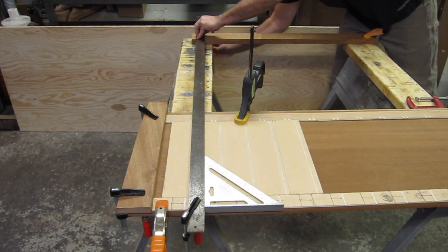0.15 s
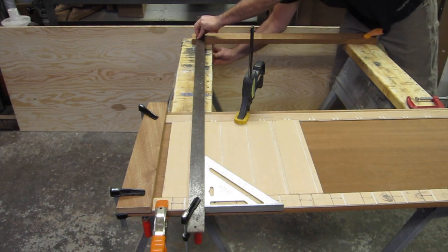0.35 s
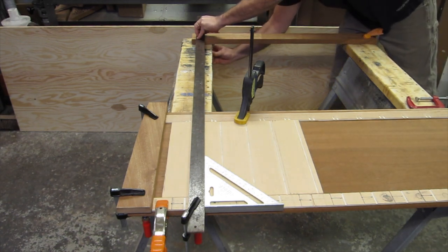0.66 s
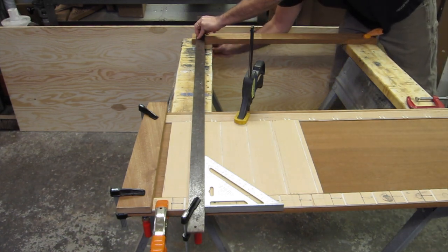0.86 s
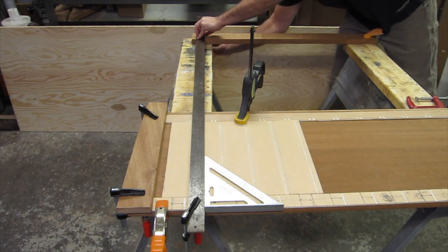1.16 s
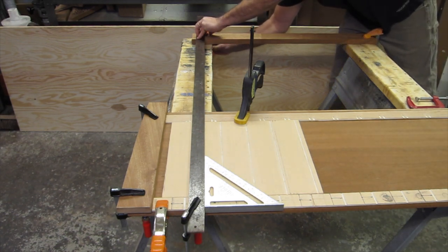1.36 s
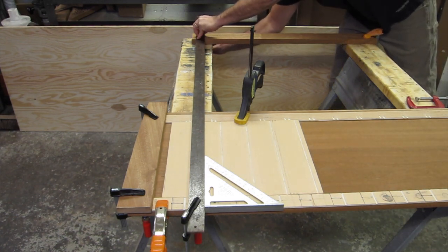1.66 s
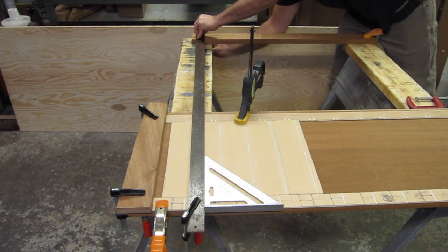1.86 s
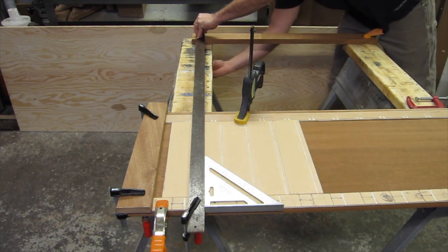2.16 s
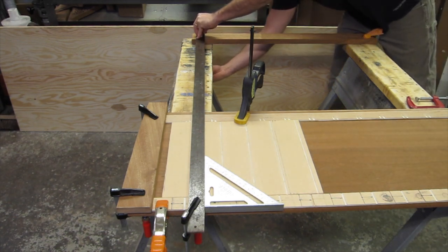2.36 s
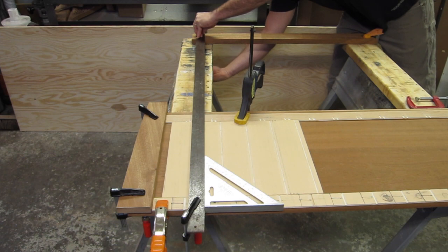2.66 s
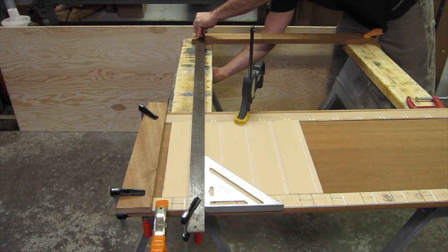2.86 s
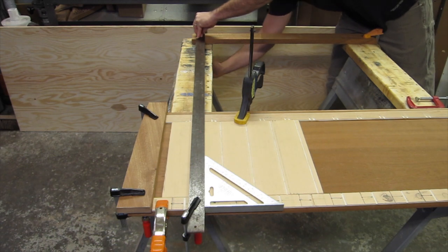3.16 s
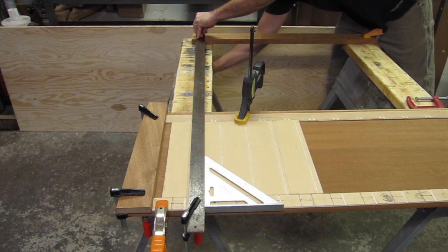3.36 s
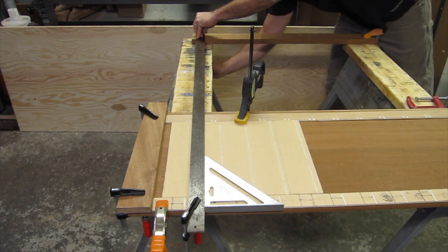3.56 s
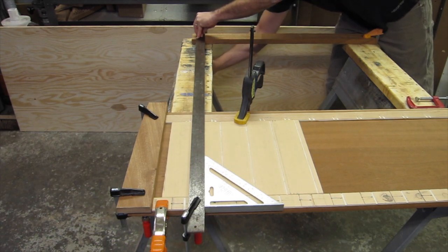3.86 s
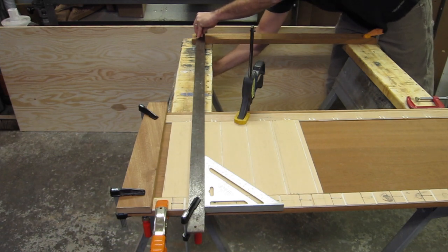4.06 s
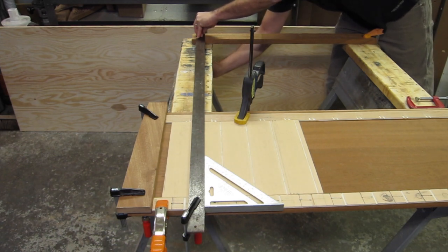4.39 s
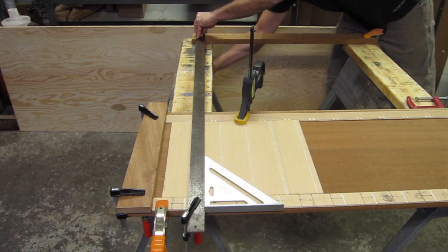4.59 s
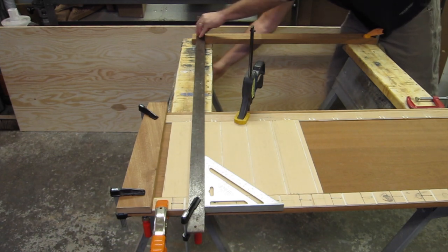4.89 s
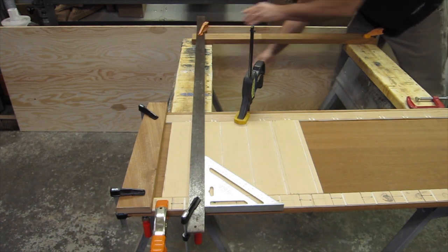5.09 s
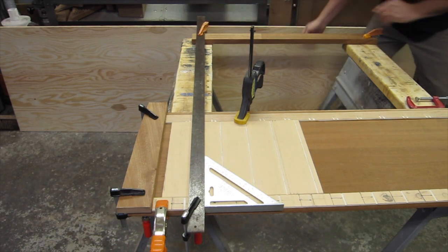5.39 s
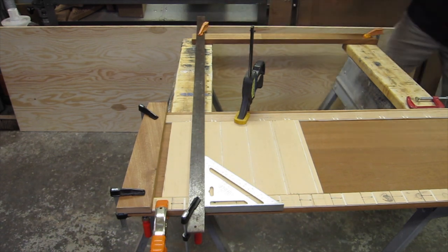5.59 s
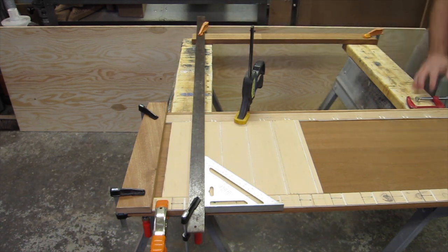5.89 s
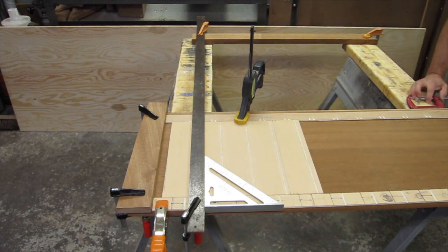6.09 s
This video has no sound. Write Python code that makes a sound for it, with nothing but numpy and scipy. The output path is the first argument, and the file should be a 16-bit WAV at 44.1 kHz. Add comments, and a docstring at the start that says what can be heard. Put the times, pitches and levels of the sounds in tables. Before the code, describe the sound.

Irregular metallic clacks, soft screw ticks and hand rustles in a woodshop over low fan hum, ending with a sharp tool knock.

```python
"""In a small woodshop, a bar clamp is fitted over a steel straight edge on a wooden panel and screwed tight.
Bar, jaw, straight edge, pad and handle knock, the screw ticks and a tool is bumped at the end: noise bursts
ring each part's modes and a room echo. The bar groans as it takes the load: wobbling tones with a rasp.
Hands brush the work (grainy noise), trestles and a foot thud (dying low tones).
Behind it all lie air noise, a fan's drone (narrow bands of noise) and a faint whine (steady tones)."""
import sys
import numpy as np
from scipy import signal
from scipy.fft import rfft, irfft, next_fast_len
from scipy.io import wavfile
from scipy.ndimage import uniform_filter1d

SR = 44100
rng = np.random.default_rng(int(sys.argv[2]) if len(sys.argv) > 2 else 0)


def to_wav(s):
    """Save 16-bit WAV."""
    ch = np.atleast_2d(s).T  # columns
    pcm = np.round(np.clip(ch, -1, 1) * 32767)  # PCM
    wavfile.write(sys.argv[1], SR, pcm.astype(np.int16))


N = 275051

# how wide the room's sound is at each pitch: (frequency [Hz], side level over mid [dB])
SIDE_IN_ROOM = [(60, -35), (150, -29), (350, -19), (700, -14), (1400, -8), (2800, -4), (5000, 0),
                (12000, -0.5)]
# what the straight edge rings with: (frequency [Hz], width [Hz], height [dB], ring t60 [s])
STRAIGHT_EDGE_MODES = [(378, 7, 11.4, 0.88), (880, 96, 7.5, 0.24), (1210, 380, 5.9, 0.7),
                       (1670, 100, 12.3, 0.29), (1840, 74, 6.2, 0.16), (2277, 120, 15, 0.16),
                       (2815, 210, 11.5, 0.3), (3250, 110, 6.5, 0.17), (3680, 150, 3.7, 0.16),
                       (4680, 100, 18.6, 0.23), (5500, 470, 10, 0.081), (6160, 110, 8.2, 0.13),
                       (7940, 91, 16, .15), (9550, 170, 12, 0.26), (10830, 160, 16, 0.22),
                       (11700, 160, 6.6, 0.24), (12410, 150, 6, 0.27), (13517, 120, 7.3, 0.18)]


def amp(db):
    """Turns decibels into a plain factor."""
    return 10 ** (np.asarray(db) / 20)


def unit(x):
    """Scaled to energy 1."""
    return x / np.sqrt(np.sum(x ** 2) + 1e-20)


def evened(x):
    """Scaled to rms 1."""
    return unit(x) * np.sqrt(x.size)


def read(points, hz):
    """Reads a curve along straight lines on a log-frequency axis."""
    f, value = np.transpose(points)
    return np.interp(np.log(hz + 1), np.log(f + 1), value)


def add(mix, s, sound):
    """Mixes a sound in at time s."""
    part = mix[..., max(round(s * SR), 0):][..., :sound.shape[-1]]
    part += sound[..., :part.shape[-1]]


def shaped(x, points):
    """Filtered by a spectrum of (Hz, dB) points."""
    size = next_fast_len(len(x))
    gain = amp(read(points, np.fft.rfftfreq(size, 1 / SR)))
    return irfft(rfft(x, size) * gain, size)[:len(x)]


def causal(points, size=2048):
    """The shortest causal pulse with this spectrum."""
    log_gain = np.log(amp(read(points, abs(np.fft.fftfreq(size, 1 / SR)))))
    return np.fft.ifft(np.exp(signal.hilbert(log_gain).conj())).real


def pair(mid, side):
    """Left and right from mid and side."""
    return np.array([mid + side, mid - side])


def shop(air_db=-50.5, drone_side_db=-18):
    """Steady air noise, a fan's wavering drone and a faint whine."""
    # colour of the air noise: (frequency [Hz], relative level [dB per Hz])
    air_colour = [(20, -15), (58, 3.5), (100, 2), (140, 4.5), (200, 4), (330, 1.5), (450, -5.5),
                  (700, -6.5), (1200, -10.5), (2000, -11), (3200, -19), (5500, -21), (7000, -28),
                  (11500, -28), (14000, -29.5), (16000, -60)]
    # width of the air noise: (frequency [Hz], side level over mid [dB])
    air_side = [(30, -4), (100, -4.5), (200, -12), (400, -4.5), (1000, -4), (2500, -1.5), (4500, 0.5),
                (12000, -0.5)]
    # the fan's narrow bands: (frequency [Hz], half-width [Hz], level [dB])
    drone_bands = [(60.5, 10.4, -62.5), (193.3, 2.5, -50.5), (235, 1.75, -52.5), (290.7, 3.4, -52),
                   (354, 2, -58), (960, 6.4, -66)]
    # steady high tones: (frequency [Hz], level [dB])
    whine_tones = [(8799, -80), (15735, -82)]
    mid, side = (evened(shaped(rng.standard_normal(N), air_colour)) for _ in range(2))
    air = amp(air_db) * pair(mid, shaped(side, air_side))

    size = next_fast_len(N)
    f, t = np.fft.rfftfreq(size, 1 / SR), np.arange(N) / SR
    noise = rfft(rng.standard_normal((2, size)))
    lines = sum(amp(db) * unit(1 / (1 + ((f - hz) / width) ** 2)) for hz, width, db in drone_bands)
    mid, side = irfft(noise * lines * np.sqrt(size / 2), size)[:, :N]
    drone = pair(mid, amp(drone_side_db) * side)

    whine = sum(amp(db) * np.sqrt(2) * np.sin(2 * np.pi * hz * t) for hz, db in whine_tones)
    return air + drone + whine


def room(early_db=-3, early_s=0.0067, gap_s=0.0042):
    """Echo of the shop: strong early returns from bench and floor, then a tail that loses its treble first."""
    # time the echo takes to fall by 60 dB: (frequency [Hz], t60 [s])
    echo_t60 = [(100, 1), (300, 1), (700, 0.7), (1400, 0.58), (2700, 0.44), (5400, 0.37), (11000, 0.27),
                (16000, 0.24)]
    hz, t, z = signal.stft(rng.standard_normal((2, SR)), SR, nperseg=256)
    fading = z * amp(-60 * t / read(echo_t60, hz)[:, None])
    mid, side = signal.istft(fading, SR, nperseg=256)[1][:, :SR]
    t = np.arange(SR) / SR
    swell = (1 + amp(early_db) * np.exp(-t / early_s)) * (1 - np.exp(-t / gap_s))
    return pair(unit(mid * swell), shaped(unit(side * swell), SIDE_IN_ROOM))


def ringing(modes, t, flutter=0.7):
    """Dying modes that flutter as the parts settle; low ones are nearly in step left and right, high ones less."""
    out = np.zeros((2, len(t)))
    for hz, width, db, t60 in modes:
        apart = rng.choice([-1, 1]) * np.arctan(amp(read(SIDE_IN_ROOM, hz)))
        phase = 2 * np.pi * rng.random() + np.array([[apart], [-apart]])
        knots = np.arange(0, 1, 1 / 80)  # a new random value 80 times a second
        sway, slip = (np.interp(t, knots, k) for k in flutter * rng.standard_normal((2, len(knots))))
        decay = unit(amp(-60 * t / t60) * (1 - np.exp(-t / 0.00037)) * (1 + sway))
        # a mode takes the share of a blow's energy that falls within its width
        out += np.sqrt(4 * width / SR) * decay * np.sin(2 * np.pi * hz * t + phase + slip)
    return out


def body(modes, size=420):
    """Resonant peaks of a part as (Hz, dB), levelled so that each octave keeps its energy."""
    f = np.geomspace(30, SR / 2, 4000)
    peaks = (amp(db) ** 2 / (1 + (2 * (f - hz) / width) ** 2) ** 1.25 for hz, width, db, t60 in modes)
    power = 1 + sum(peaks)
    return f, 10 * np.log10(power / uniform_filter1d(power, size))


def contact(f, cut_hz, tilt_db, rolloff_db):
    """Spectrum of a blow in dB: a tilt above 330 Hz, then a fall of rolloff_db per octave past the cut-off."""
    tilt = tilt_db * np.log2(np.maximum(f, 330) / 1000)  # pivots at 1000 Hz
    return tilt - 10 * np.log10(1 + (f / cut_hz) ** (rolloff_db / (10 * np.log10(2))))


def knocks(rows, modes, colour, rolloff_db, chatter_s, direct_db, room_db, ring_db, pan_db, left_lag_s=0):
    """Each blow is a snap and a short chatter of loose parts; it rings the part's modes and fills the room.

    A softer contact has a lower cut-off; a heavier push tilts the sound towards the bass."""
    # for all parts: small parts radiate little bass, the floor bounce cancels near 255 Hz and the very top
    # fades: (frequency [Hz], level [dB])
    shared_colour = [(40, -22), (100, -16), (150, 1), (215, -0.5), (255, -11), (330, 0), (11500, -0.5),
                     (13200, 4.5), (15300, -28)]
    out, t = np.zeros((2, N)), np.arange(SR * 3 // 4) / SR
    f, peaks_db = body(modes)
    part_db = peaks_db + read(colour, f) + read(shared_colour, f)
    for s, db, cut_hz, tilt_db, hard_db in rows:
        snap, chatter, scatter = rng.standard_normal((3, len(t)))
        rattle = np.exp(-t / chatter_s) * (1 - np.exp(-t / 0.00064))
        chatter = unit(chatter * rattle)
        scatter = shaped(unit(scatter * rattle), SIDE_IN_ROOM)
        blow = chatter + amp(hard_db) * unit(snap * np.exp(-t / 0.003))
        left, right = pair(blow, scatter) / np.linalg.norm(blow)
        left = np.roll(left, round(left_lag_s * SR))
        direct = np.array([left * amp(pan_db), right * amp(-pan_db)])
        sound = amp(direct_db) * direct + amp(room_db) * room()[:, :len(t)]
        sound = sound + amp(ring_db) * ringing(modes, t)
        spectrum_db = db + part_db + contact(f, cut_hz, tilt_db, rolloff_db)
        pulse = causal(np.transpose([f, spectrum_db]), size=4096)
        add(out, s, signal.fftconvolve(sound, pulse[None], axes=1))
    return out


def bar_knocks():
    """The bar is struck: a long chatter and modes that ring from low to very high."""
    # (time [s], strength [dB], contact cut-off [Hz], tilt [dB per octave], snap over chatter [dB])
    blows = [(0.052, 16, 12000, -0.03, 11), (0.297, 14, 5430, -2.3, 10), (1.658, 11, 3070, 0, 0),
             (2.023, 8.5, 2220, 1.8, 17)]
    # what it rings with: (frequency [Hz], width [Hz], height [dB], ring t60 [s])
    modes = [(419, 63, 11, 0.93), (544, 39, 13.5, 0.67), (1118, 35, 8, 0.35), (1676, 63, 10.5, 1),
             (1894, 62, 14.5, 0.22), (2005, 56, 13.5, 0.25), (2363, 180, 8, 0.27), (2895, 56, 8, .25),
             (3380, 180, 6.5, 0.099), (3650, 94, 7, 0.18), (5946, 97, 9, 0.2), (7960, 110, 16, .2),
             (10640, 360, 12, 0.27), (12300, 170, 22, 0.27), (15165, 90, 20, .2)]
    # broad colour under a hard blow: (frequency [Hz], level [dB])
    colour = [(200, -1.5), (330, 4), (660, 1), (1700, -1.5), (3100, -3.5), (5300, -18.5), (11500, -25.5)]
    return knocks(blows, modes, colour, rolloff_db=29, chatter_s=0.02,
                  direct_db=-8.5, room_db=-2, ring_db=-8.0, pan_db=-1.0)


def thuds(rise_s=0.0064):
    """Low blows swell and die in the room's bass resonances, each a fading sine tone."""
    # dull thuds of the trestles and a foot: (time [s], frequency [Hz], level [dB], t60 [s])
    low_blows = [(0.069, 186, -43.5, 0.53), (0.711, 141.6, -36, 0.7), (1.758, 175, -53, 0.64),
                 (3.223, 171, -37, 0.3), (5.403, 169, -43, 0.35), (5.421, 232, -32, 0.16)]
    out, t = np.zeros(N), np.arange(SR) / SR
    for s, hz, db, t60 in low_blows:
        envelope = amp(db - 60 * t / t60) * (1 - np.exp(-t / rise_s))
        add(out, s, envelope * np.sin(2 * np.pi * hz * t))
    return out


def groans(wobble=0.0062, rasp_db=-16, mode_wobble=0.005):
    """Stick and slip lock onto the bar's bending mode; higher modes sing, each slip rasps the straight edge."""
    # the bar slips under load: (time [s], length [s], pitch [Hz], glide [Hz], level of the main tone [dB])
    slipping = [(0.299, 0.18, 345.8, -1.5, -30.5), (3.647, 0.15, 352.8, -5.5, -30)]
    # higher resonances of the clamp that sing along: (frequency [Hz], level over the main tone [dB])
    singing_modes = [(590, -17), (950, -17), (1790, -20), (2280, -23), (2950, -31)]
    rasp_colour = [(300, -21), (550, -0.5), (2400, -7.0), (4000, -17), (8000, -35)]  # (Hz, dB)
    tone, rasp = np.zeros((2, N))
    for s, length, hz, glide_hz, db in slipping:
        u = np.linspace(0, 1, round(length * SR))
        unsteady = evened(uniform_filter1d(rng.standard_normal(SR), 300))[:len(u)]
        turns = np.cumsum((hz + glide_hz * (u - .5)) * (1 + wobble * unsteady)) / SR
        load = amp(db) * np.sin(np.pi * u) * (1 + .07 * unsteady)
        # one click of random strength per turn of the main tone
        slips = np.diff(np.floor(turns), prepend=0) * rng.exponential(1, SR)[:len(u)]
        clock = np.cumsum(1 + mode_wobble * unsteady) / SR
        singing = sum(amp(mode_db) * np.sin(2 * np.pi * mode_hz * clock)
                      for mode_hz, mode_db in singing_modes)
        add(tone, s, load * np.sqrt(2) * (np.sin(2 * np.pi * turns) + singing))
        add(rasp, s, load * evened(shaped(slips, rasp_colour)))
    rasp = signal.fftconvolve(rasp, causal(np.transpose(body(STRAIGHT_EDGE_MODES))))[:N]
    return tone + amp(rasp_db) * signal.fftconvolve(room(), rasp[None], axes=1)[:, :N]


def brushes(grain_db=4, direct_db=-6, room_db=0.5):
    """Grainy friction under each stroke of a hand: hiss whose loudness jitters."""
    # hands and sleeves over wood and steel: (time [s], length [s], level before the direct and room
    # shares [dB], brightness [dB])
    strokes = [(0.39, 0.041, -57, 2), (1.02, 0.23, -51.5, -18), (1.312, 0.31, -51.5, -2),
               (3.466, 0.065, -64, 21), (3.648, 0.057, -37.5, 3), (3.772, 0.062, -44, 0.5),
               (4.822, 0.097, -49, 5), (4.953, 0.084, -53, -20), (5.155, 1, -58.5, 4.5),
               (5.686, 0.026, -55, 5), (5.854, 0.1, -46.5, 6), (5.906, 0.23, -44.5, 6.5)]
    # colour of the friction: (frequency [Hz], level [dB])
    friction_colour = [(100, -10), (400, 13.5), (1200, 4), (2200, 6.5), (3300, 0.5), (5000, -2),
                       (7000, -12), (11500, -12.5), (16000, -23)]
    out = np.zeros(N)
    for s, length, db, bright_db in strokes:
        hiss, grain = rng.standard_normal((2, SR))
        hiss = hiss * amp(grain_db * evened(uniform_filter1d(grain, 120)))
        hiss = shaped(hiss, friction_colour)
        # brightness lowers the bass and lifts the treble
        hiss = shaped(hiss, [(2000, -bright_db), (11000, bright_db)])[:round(length * SR)]
        add(out, s, amp(db) * evened(hiss) * signal.windows.tukey(len(hiss), .6))
    echo = signal.fftconvolve(room(), out[None], axes=1)[:, :N]
    return amp(direct_db) * out + amp(room_db) * echo


def jaw_knocks():
    """The jaw is struck: a short chatter whose treble falls gently past the contact's cut-off."""
    # (time [s], strength [dB], contact cut-off [Hz], tilt [dB per octave], snap over chatter [dB])
    blows = [(0.663, 13.5, 5000, 0.5, -15), (0.668, 22.4, 15000, 0.65, -3), (0.785, 12, 2100, 1.5, -16),
             (0.94, 10.6, 700, -1, -18), (1.292, 10.6, 1500, 0.7, -6), (1.301, 17.7, 910, 2, -1),
             (1.368, 4.4, 1800, -7, -21), (1.46, 3.1, 2500, -3.5, 0), (1.499, 2.6, 2500, -7.5, -13)]
    # what it rings with: (frequency [Hz], width [Hz], height [dB], ring t60 [s])
    modes = [(479, 24, 7.4, 0.39), (575, 20, 12.1, 1), (795, 46, 3, 0.38), (970, 110, 7.6, 0.44),
             (1246, 95, 7.5, 0.12), (1671, 36, 13.8, 0.13), (1726, 28, 3, 1), (2650, 90, 2.7, 0.35),
             (3724, 67, 8.5, 0.24), (4530, 230, 7.4, 0.15), (4660, 67, 3.4, 0.77), (5980, 460, 5, 0.12),
             (10050, 400, 12.5, 0.11), (11100, 390, 12, 0.13), (12650, 220, 4.3, .13)]
    # broad colour under a hard blow: (frequency [Hz], level [dB])
    colour = [(200, -9.5), (330, 0.5), (660, 1), (1700, -2.5), (3100, -9.5), (5300, -12), (11500, -21.5)]
    return knocks(blows, modes, colour, rolloff_db=12, chatter_s=0.0079,
                  direct_db=-5.5, room_db=-2.0, ring_db=-4.5, pan_db=-1.0)


def edge_knocks():
    """The steel straight edge is struck and rings with the same modes that its rasp passes through."""
    # (time [s], strength [dB], contact cut-off [Hz], tilt [dB per octave], snap over chatter [dB])
    blows = [(1.74, 24.2, 6350, -0.44, 9), (2.48, 6.8, 1850, -0.1, -8)]
    # broad colour under a hard blow: (frequency [Hz], level [dB])
    colour = [(200, -7.5), (330, 1), (660, -0.5), (1700, -1.1), (3100, -0.2), (5300, -14), (11500, -2.5)]
    return knocks(blows, STRAIGHT_EDGE_MODES, colour, rolloff_db=26, chatter_s=0.012,
                  direct_db=-11.5, room_db=-3.5, ring_db=-8, pan_db=-1.2)


def pad_knocks():
    """The pad is struck: its ring is as strong as its room echo and well above the direct blow."""
    # (time [s], strength [dB], contact cut-off [Hz], tilt [dB per octave], snap over chatter [dB])
    blows = [(2.188, 20.76, 5800, 1.27, -7), (2.328, 8.5, 2760, 6.5, 15), (2.555, 2.4, 1600, -3, -15)]
    # what it rings with: (frequency [Hz], width [Hz], height [dB], ring t60 [s])
    modes = [(400, 20, 8.7, 0.25), (560.6, 84, 15, 0.23), (776, 18, 11.4, 0.46), (1056, 15, 3.8, 0.26),
             (1737, 130, 11, .35), (2260, 290, 8.6, 0.18), (2420, 400, 8.8, 0.14), (2940, 110, 5, 0.26),
             (3340, 41, 5.1, 0.17), (5220, 140, 15.5, 0.3), (5700, 160, 4.9, 0.17), (6700, 150, 4.9, 0.21),
             (9630, 200, 22, 0.37), (11600, 300, 17, .2), (12408, 150, 7, .2), (13350, 150, 7.3, 0.13)]
    # broad colour under a hard blow: (frequency [Hz], level [dB])
    colour = [(200, -11.5), (330, -0.5), (550, 3), (1000, -1.5), (1700, -4.5), (3100, -9.5), (5300, -14.5),
              (11500, -16.5)]
    return knocks(blows, modes, colour, rolloff_db=23.5, chatter_s=0.016,
                  direct_db=-13, room_db=-3.5, ring_db=-3.5, pan_db=0.0)


def handle_knocks():
    """The handle is struck: a short chatter and modes in the low and middle range."""
    # (time [s], strength [dB], contact cut-off [Hz], tilt [dB per octave], snap over chatter [dB])
    blows = [(2.758, 8.5, 1830, -1.5, -6), (2.8, 14.1, 2350, -1.3, 11), (3.147, 16.2, 3660, 0.84, 6),
             (3.221, 20.5, 2400, 1.2, 1)]
    # what it rings with: (frequency [Hz], width [Hz], height [dB], ring t60 [s])
    modes = [(384.5, 15, 9.2, 0.54), (567.4, 50, 6.4, 0.23), (832, 22, 4, 0.21), (965, 67, 4.6, 0.3),
             (1208, 120, 8.8, 0.21), (1610, 66, 4.8, 0.23), (1745, 72, 8, 0.19), (1875, 57, 7.7, 0.2),
             (2266, 60, 11, 0.27), (2490, 180, 7.6, 0.31), (2880, 89, 11, 0.44), (3370, 200, 8.8, 0.078)]
    # broad colour under a hard blow: (frequency [Hz], level [dB])
    colour = [(200, -10), (330, -3), (660, -1), (1150, -2.5), (1700, -1.5), (3100, -6.5), (5300, -18),
              (11500, -12)]
    return knocks(blows, modes, colour, rolloff_db=20, chatter_s=0.0075,
                  direct_db=-10.0, room_db=-7, ring_db=-7.0, pan_db=0.0)


def screw_ticks():
    """The screw ticks: the shortest chatter of all and only a few modes, a little to the left."""
    # (time [s], strength [dB], contact cut-off [Hz], tilt [dB per octave], snap over chatter [dB])
    blows = [(3.118, -21, 14000, 3, 16), (3.663, -4.5, 5500, 0.5, -15), (3.887, 1.5, 4450, 0.2, -6),
             (4.037, 2, 4210, 1.5, -1), (4.1, 7, 850, 3, -12), (4.346, 1.2, 2400, 0.1, 6),
             (4.46, 0.6, 3000, 0.7, -8), (4.535, 1.5, 1140, -1.5, -12), (4.567, -9, 1100, -7, -3),
             (4.735, 1, 1100, -2, -10), (5.061, -10, 1000, -2, -3)]
    # what it rings with: (frequency [Hz], width [Hz], height [dB], ring t60 [s])
    modes = [(923, 250, 5.7, 0.37), (1810, 140, 6, 0.58), (1900, 82, 5.8, 0.39), (2260, 380, 5.7, 0.41),
             (3360, 82, 1.3, 0.12)]
    # broad colour under a hard blow: (frequency [Hz], level [dB])
    colour = [(200, -20), (330, -1), (660, -1), (1700, 1.7), (3100, 2.5), (5300, -4.5), (11500, 0)]
    return knocks(blows, modes, colour, rolloff_db=12.5, chatter_s=0.0023,
                  direct_db=-13.5, room_db=-4.5, ring_db=-5.5, pan_db=1.0)


def tool_knock():
    """A tool is bumped; the blow reaches the left side slightly later and softer than the right."""
    # (time [s], strength [dB], contact cut-off [Hz], tilt [dB per octave], snap over chatter [dB])
    blows = [(5.988, 21.9, 14000, 0.3, 1.8)]
    # what it rings with: (frequency [Hz], width [Hz], height [dB], ring t60 [s])
    modes = [(359, 43, 11, 0.9), (650, 97, 21, 0.5), (958, 140, 22, 0.23), (1090, 46, 7.8, 0.64),
             (1790, 280, 13, 0.15), (1980, 110, 20, .35), (2170, 200, 22.5, 0.36), (2614, 180, 17, 0.46),
             (3500, 63, 3.7, .25), (5040, 670, 18, 0.45), (6480, 350, 17.4, 0.13), (12200, 120, 7, .22),
             (12900, 560, 3.2, .08)]
    # broad colour under a hard blow: (frequency [Hz], level [dB])
    colour = [(200, -5), (330, -1.8), (660, -0.5), (1700, 4), (3100, -0.5), (5300, -9.5), (11500, -18)]
    return knocks(blows, modes, colour, rolloff_db=24, chatter_s=0.0089,
                  direct_db=-9.0, room_db=-3.5, ring_db=-6.5, pan_db=-0.5, left_lag_s=0.000045)


def scene():
    """The struck parts, the groaning bar, the hands and the shop around them."""
    background = shop() + thuds()
    handling = groans() + brushes()
    clamp = bar_knocks() + jaw_knocks() + pad_knocks() + handle_knocks() + screw_ticks()
    return background + handling + clamp + edge_knocks() + tool_knock()


def record(dry, notch_hz=8230, top_hz=15950):
    """A narrow notch dips the treble, then a steep low-pass removes the very top."""
    band = [notch_hz - 490, notch_hz + 490]
    notch = signal.butter(4, band, "bandstop", fs=SR, output="sos")
    low_pass = signal.firwin(511, top_hz, window=("kaiser", 9), fs=SR)
    return signal.oaconvolve(signal.sosfilt(notch, dry), low_pass[None], "same")


dry = scene()
out = record(dry)
to_wav(out)
```